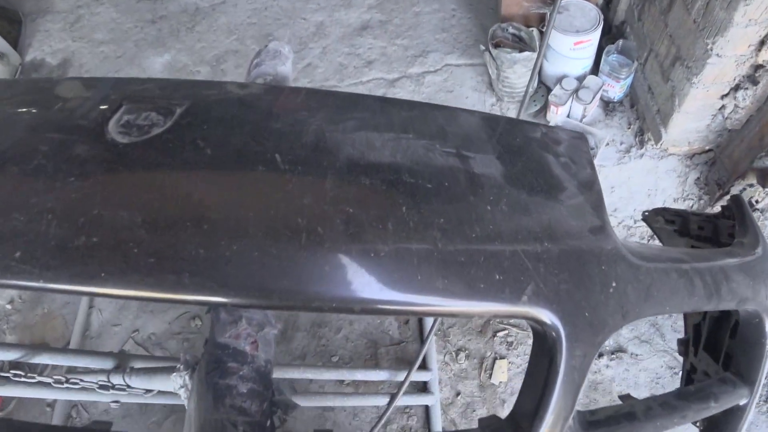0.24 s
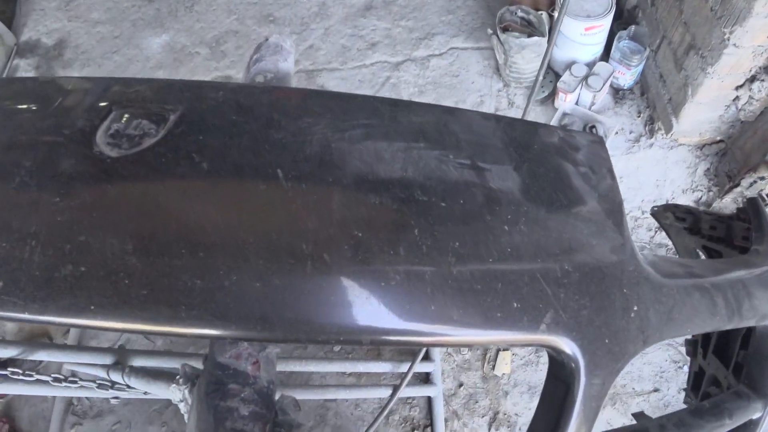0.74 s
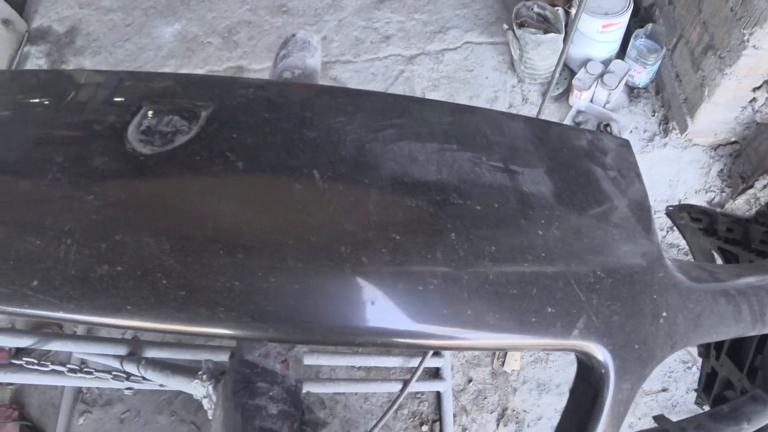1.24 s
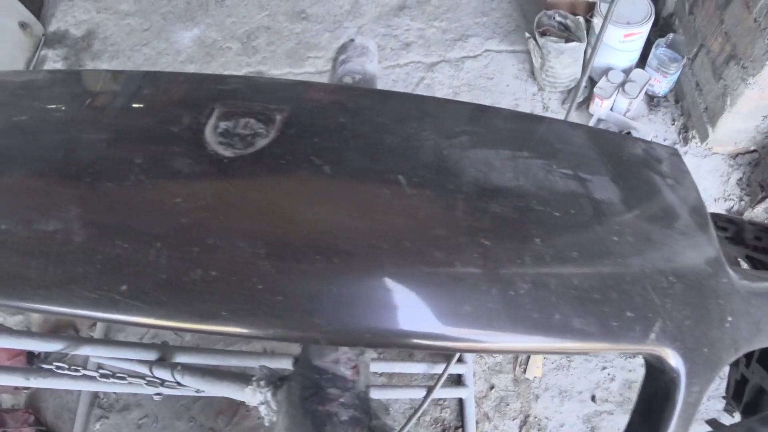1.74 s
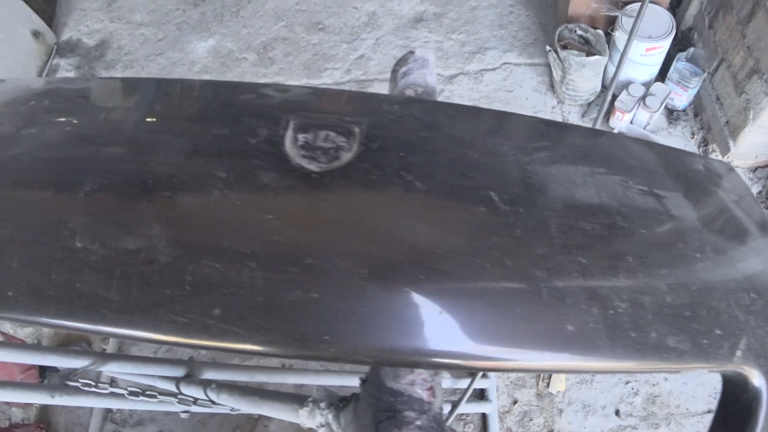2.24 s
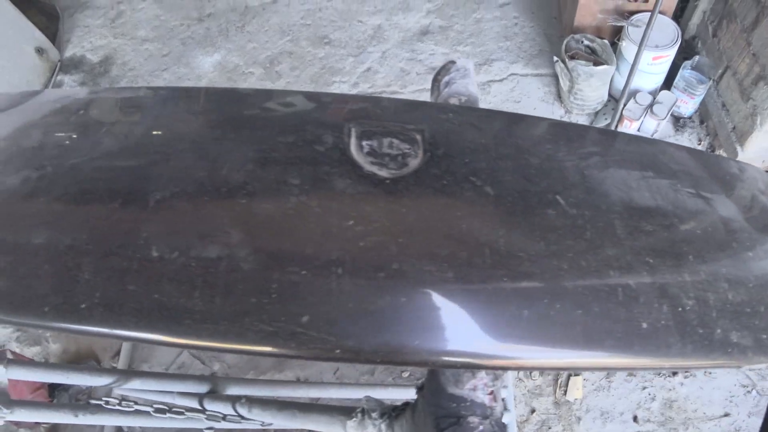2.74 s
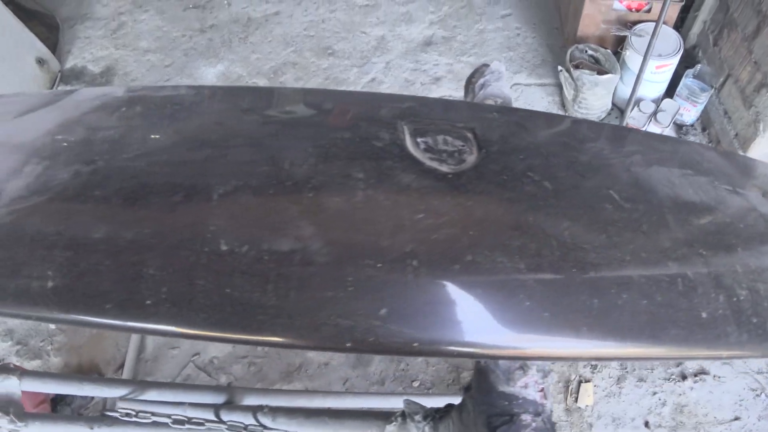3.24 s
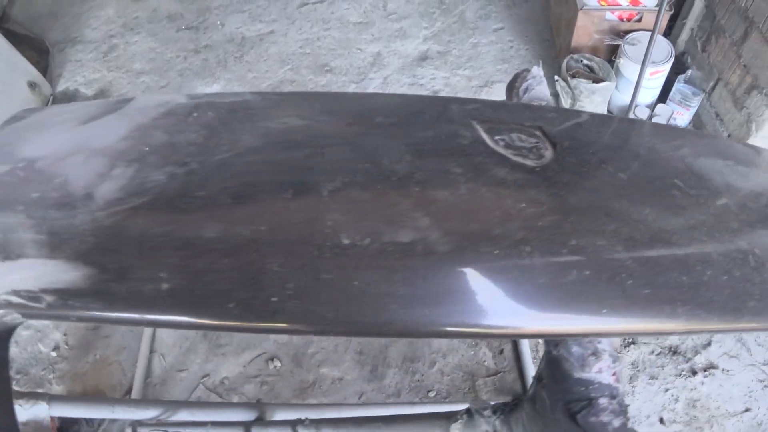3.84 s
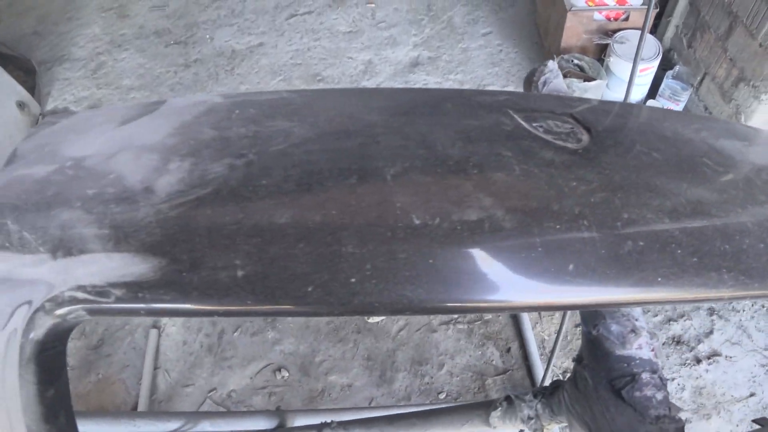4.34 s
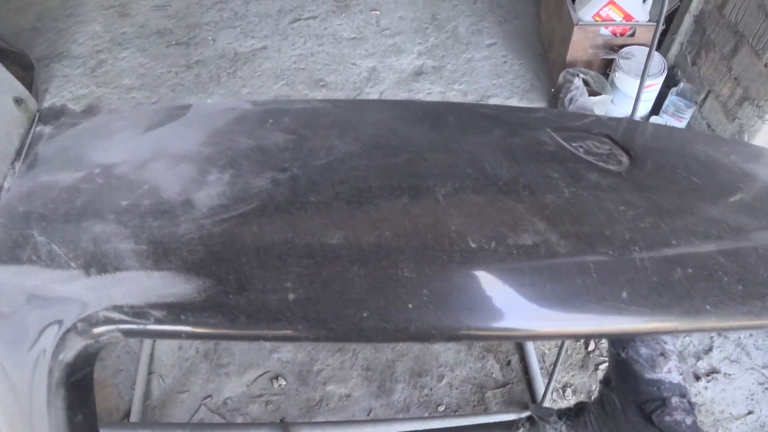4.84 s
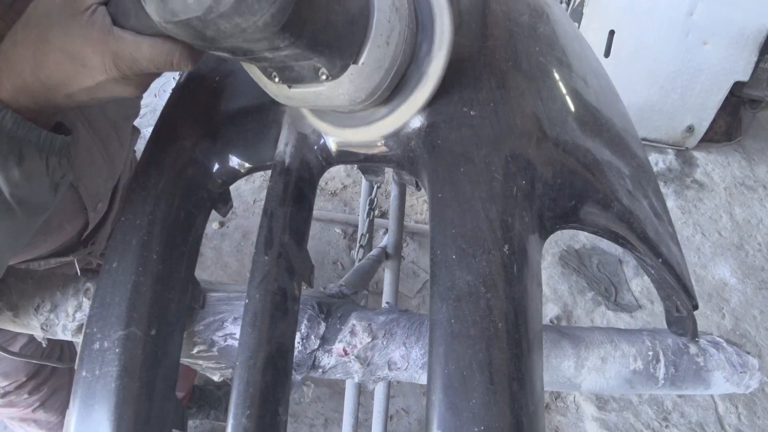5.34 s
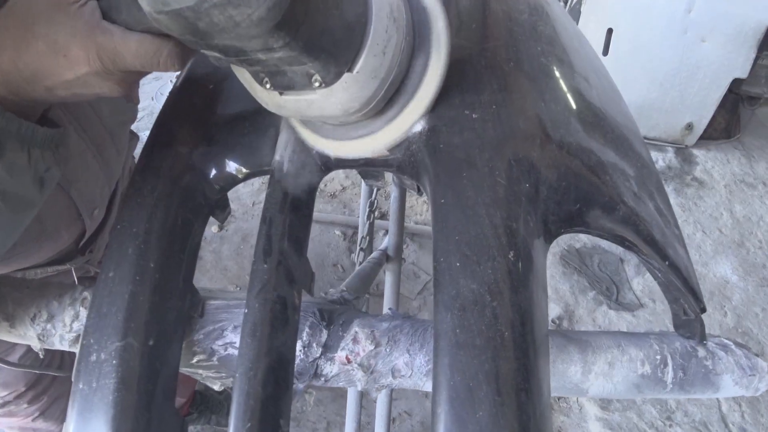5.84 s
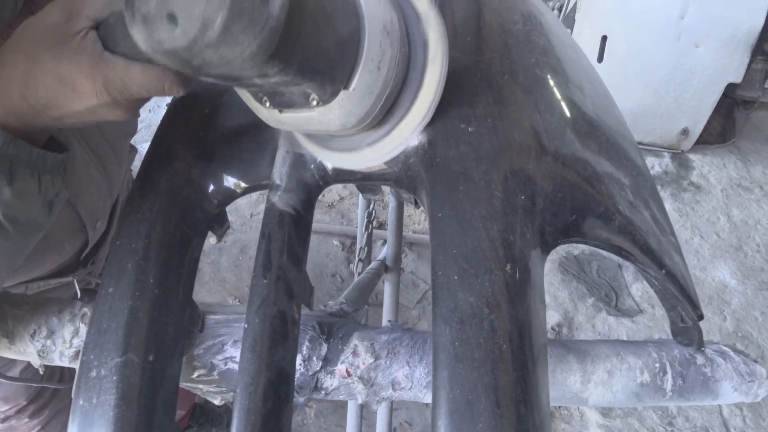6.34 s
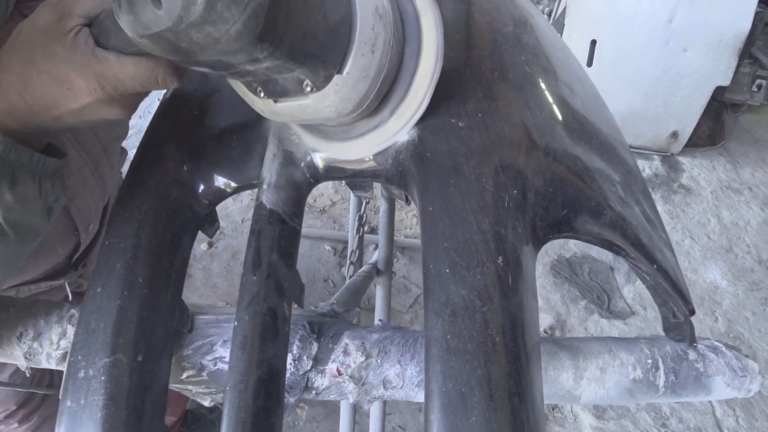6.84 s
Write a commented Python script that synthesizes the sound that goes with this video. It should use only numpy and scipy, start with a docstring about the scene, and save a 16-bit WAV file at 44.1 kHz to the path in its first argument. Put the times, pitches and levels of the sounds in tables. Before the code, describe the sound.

A grinder disc scrapes and squeals while coasting down, lifts off, then growls back up to a steady whine and hisses and buzzes against a hollow plastic panel.

```python
"""An angle grinder sands paint off a plastic bumper in a small workshop.
The disc coasts down: scraping noise and gear overtones that squeal in the resonances of disc and gear head.
Switched on again it growls, then runs free with the noise of its air and the whine of fan and gears. Pressed
on, it hisses (noise bursts once a turn) and slaps the hollow panel (partials of the spindle speed).
After a short silence with a brief ping the same work goes on, heard from beside the gear head."""
import sys
import numpy as np
from scipy import signal
from scipy.fft import rfft, irfft, next_fast_len
from scipy.io import wavfile
from scipy.ndimage import uniform_filter1d, map_coordinates

SR = 44100
rng = np.random.default_rng(int(sys.argv[2]) if len(sys.argv) > 2 else 0)


def inscribe(sig):
    """Save sig as 16-bit PCM at rate SR to the path in sys.argv[1].

    A 1-D sig is mono; a 2-D sig holds one channel per row.
    Samples are clipped to [-1, 1] before scaling.
    """
    pcm = np.round(np.clip(np.atleast_2d(sig).T, -1, 1) * 32767)
    wavfile.write(sys.argv[1], SR, pcm.astype(np.int16))


N = 312228
T = np.arange(N) / SR  # time [s]

# spindle speed under power, sagging with the load: (time [s], speed [turns/s])
RUNNING_SPEED = [(1.88, 112.5), (2.08, 111.5), (2.4, 112.85), (3.85, 113.0), (4.2, 111.4), (4.72, 111.38),
                 (4.96, 110.3), (5.22, 110.7), (5.3, 110.05), (5.75, 110.95), (5.98, 110.68), (6.2, 109.23),
                 (6.38, 108.62), (6.62, 108.93), (7.0, 110.85)]
# tool position: (time [s], left minus right [dB])
TOOL_PAN = [(0.0, -1.0), (1.1, -3), (2.95, -3.5), (3.42, 7), (4.05, 2.2), (5.3, 1.2), (7.08, 1.3)]
# left-right correlation of the noises: (frequency [Hz], correlation [0-1])
STEREO_LIKENESS = [(60, 0.98), (170, 0.82), (490, 0.95), (1400, 0.56), (3980, 0.85), (11400, 0.72)]
# resonances of disc and gear head: (frequency [Hz], width [Hz], relative gain [dB])
HEAD_RESONANCES = [(890, 72, -3), (1275, 28, -2.5), (2103, 73, 1.5), (2232, 23, 4.5), (2580, 124, 0.5),
                   (2900, 170, 5.5), (3404, 61, 3.5), (4230, 900, -3), (4620, 280, -4.5), (5000, 170, -4),
                   (5440, 45, 2.5), (6060, 150, 1), (7160, 190, -2.5), (7770, 250, -6)]
# noise colours of scrape, cooling air and grit: (frequency [Hz], relative density [dB])
SCRAPE_COLOUR = [(24, -61), (40, -27), (130, -30.5), (250, -16.5), (625, -9.5), (687, -11.5), (911, -5),
                 (1070, -9.5), (1360, -5.5), (1490, -5.5), (2390, -5), (2880, -6), (3240, -6.5),
                 (6110, -5.5), (11000, -12), (14300, -47), (22000, -120)]
AIR_COLOUR = [(30, -51), (70, -26), (160, -23), (300, -13), (480, -7), (750, 2.5), (1000, 2), (1150, 2),
              (1400, 5), (2200, -0.5), (3200, 0.5), (5000, -0.5), (7500, -1.5), (9000, -6), (11000, -5)]
GRIT_COLOUR = [(200, -45), (1500, -26), (3200, -5.5), (4500, -3), (6000, 2.5), (7600, 5.5), (9200, 2.5),
               (10400, 3.5), (11200, 0)]
# colour of the panel's rattle: (frequency [Hz], relative density [dB])
RATTLE_COLOUR = [(40, -53), (150, -10), (300, -29), (800, -30), (1400, -5), (2200, 7), (3500, -10), (9000, -27)]
# filter on the unloaded gear whine: (frequency [Hz], gain [dB])
LOOSE_COLOUR = [(1000, -20), (2100, 6), (2700, 1), (3400, -9), (4600, -2), (6000, -8.5)]
# gain of the unloaded gear whine: (time [s], gain [dB])
LOOSE_GAIN = [(1.07, -65.0), (1.2, -67.5), (1.4, -68.5), (1.47, -68), (1.56, -67), (1.68, -83)]
# short squeal, knock and scrapes: (time [s], level [dB], Gaussian sigma [s], centre of the noise peak [Hz])
SHORT_CONTACTS = [(1.046, -41, 0.0088, 2100), (1.165, -54, 0.017, 1010), (1.303, -58, 0.0032, 2700),
                  (4.44, -46.5, 0.014, 1100), (4.487, -45.5, 0.024, 2900)]
# reference level of motor and fan at top speed: (time [s], level [dB])
FAN_LEVEL = [(1.6, -59.5), (1.95, -58.5), (2.15, -60.5), (2.5, -61.5), (2.9, -61.5), (3.3, -60.5),
             (3.85, -53.5), (4.05, -49.5), (4.35, -51.5), (4.55, -50), (5.22, -51.5), (5.31, -56),
             (5.65, -53.5), (5.8, -51), (6.2, -52.5), (7.07, -50)]
# whine of gears and fan: (multiple of rotor speed, running free [dB re fan level], on the broad face, at the grille)
WHINE_LINES = [(8, -2, -10, -11.5), (12, 1, -7, -2), (16, -5, -4, 4), (20, -6, -6, -2.5),
               (32, -20, 0.5, -7.5)]
# further whines of constant level relative to the fan: (multiple of rotor speed, level [dB re fan level])
STEADY_WHINES = [(4, -5), (6, -6.5), (13, -11), (24, -8)]
# growl of the rotor under starting torque: (time [s], level [dB])
GROWL_LEVEL = [(1.38, -89), (1.43, -67), (1.5, -63), (1.54, -67), (1.6, -100)]
# pitch of the growl, rising as the rotor picks up: (time [s], frequency [Hz])
GROWL_PITCH = [(1.41, 535), (1.53, 768)]
# the disc pressed on the panel: (start [s], end [s], attack [s], release [s], slap reference [dB], boom [dB])
PANEL_PRESSES = [(1.895, 2.021, 0.038, 0.024, -50, -80), (3.9, 4.003, 0.037, 0.1, -43, -49.5),
                 (4.03, 4.164, .05, 0.12, -40.5, -53.5), (4.377, 4.538, 0.052, 0.073, -46.5, -67),
                 (4.482, 4.72, 0.094, .17, -42, -53.5), (4.715, 4.994, 0.059, 0.17, -42, -76.5),
                 (5.052, 5.24, 0.061, .05, -42, -59.5), (5.25, 5.44, .03, 0.21, -49.5, -71),
                 (5.644, 5.814, 0.12, .07, -46, -60), (5.85, 5.95, 0.054, 0.11, -47, -61),
                 (5.976, 6.227, 0.046, 0.089, -49.5, -63.5), (6.164, 6.72, 0.11, 0.15, -45.5, -64)]
# panel partials on the broad face and at the grille: (multiple of spindle speed, relative level [dB])
FACE_PARTIALS = [(3, -14), (4, -16), (5, -6), (6, -10), (7, -1), (8, -1), (9, 0.5), (10, -2), (11, -3.5),
                 (12, -1.5), (13, -1), (14, -8.5), (15, -20), (16, -2), (17, -4.5), (18, -3.5), (19, 0.5),
                 (20, -13.5), (21, -8), (22, -31), (23, -11), (24, -28), (25, -14)]
GRILLE_PARTIALS = [(3, -16.5), (4, -13), (5, -7.5), (6, -16), (7, 2.5), (8, 2.5), (9, -2), (10, 2),
                   (11, -5.5), (12, 3.5), (13, 0), (14, -3.5), (15, -7), (16, 3), (17, -6.5), (18, -36),
                   (19, -1), (20, -5.5), (21, 2), (22, -22.5), (23, 0), (24, -17), (25, -3.5), (26, -9)]
# hiss of grit on paint: (time [s], level [dB])
HISS_LEVEL = [(3.5, -64), (3.67, -49.5), (4.15, -47), (4.33, -44), (4.6, -43), (5.05, -40), (5.31, -44),
              (5.85, -45.5), (6.08, -43), (6.4, -41.5), (7.07, -41.5)]

LIFT_S, GAP_START_S, GAP_END_S = 1.061, 5.235, 5.299
TOP_HZ = 11080  # band limit
GEAR_RATIO = 2.991  # rotor turns per spindle turn
COAST_START_TURNS_PER_S, COAST_HALF_S = 69.85, 1.715  # drag halves the first speed in COAST_HALF_S
ON_S, RUN_UP_S, RUN_UP_SHAPE = 1.41, 0.157, 1.45  # switch-on, run-up time, steepness
COAST_DB, COAST_FADE_DB_PER_S = -38.5, 4
FAN_DB_PER_OCTAVE = 7.5  # per doubling of speed
WHINE_SWELL_DB, WHINE_SWELLS_PER_S = [2.8, 1.65], 7  # swell by echoes: far off, close by; rate
IDLE_BUZZ_DB = -7.5  # buzz reference of the free disc, re fan level
HUM_DB, HUM_PRESSED_DB, HUM_BOOM_DB = -22.5, -36, -21  # unbalance hum re fan level, slap reference, boom
RUN_UP_SHAKE_DB, SHAKE_SETTLE_S = 6.5, 0.87  # extra hum until the disc settles


def amp(db):
    """Decibels to gain."""
    return 10 ** (np.asarray(db) / 20)


def unit(x):
    """Scale to rms 1."""
    return x / np.sqrt(np.mean(x ** 2) + 1e-20)


def along(points, hz):
    """Interpolate (Hz, value) points on a log frequency axis."""
    f, v = np.transpose(points)
    return np.interp(np.log(hz + 1), np.log(f + 1), v)


def curves(rows):
    """One value per sample for each column after the time."""
    s, *cols = np.transpose(rows)
    return [np.interp(T, s, c) for c in cols]


def wobble(rate):
    """Smooth random curve with rate knots per second."""
    coarse = T[::32]
    knots = rng.standard_normal(int(T[-1] * rate) + 4)
    return np.interp(T, coarse, map_coordinates(knots, [coarse * rate]))


def filtered(x, response):
    """Apply a zero-phase response of frequency."""
    m = next_fast_len(N + 8192)
    return irfft(rfft(x, m) * response(np.fft.rfftfreq(m, 1 / SR)), m)[..., :N]


def rush(spectrum, patchy_db):
    """Coloured stereo noise of rms 1 with time-frequency patches of random gain."""
    z = signal.stft(rng.standard_normal((2, N)), nperseg=512)[2]
    field = uniform_filter1d(rng.standard_normal(z.shape[1:]), size=6, axis=0)
    field = uniform_filter1d(field, size=12, axis=1)
    pair = signal.istft(z * amp(patchy_db * unit(field)), nperseg=512)[1][:, :N]

    def mid_side_response(hz):
        turn = np.arccos(np.clip(along(STEREO_LIKENESS, hz), 0, 1)) / 2
        return amp(along(spectrum, hz)) * np.array([np.cos(turn), np.sin(turn)])

    mid, side = filtered(pair, mid_side_response)
    return unit(np.array([mid + side, mid - side]))


def tone(phase, fading, rate, width):
    """Stereo line of rms 1; randomly varying wall echoes add to it and cancel it."""
    def echo():
        return wobble(rate) * np.cos(phase) + wobble(rate) * np.sin(phase)

    mid = np.cos(phase) + fading * echo()
    side = width * echo()
    return unit(np.array([mid + side, mid - side]))


def once_a_turn(angle, depth_db, scatter_db):
    """Gain of rms 1, shaped once a turn by the bite of the disc's high spot, with random scatter."""
    bite = (0.5 + 0.5 * np.cos(angle)) ** 2
    return unit(amp(bite * (depth_db + scatter_db * wobble(110))))


def spindle_speed():
    """Drag slows the disc until the motor is switched on and pulls it up to running speed."""
    coast = COAST_START_TURNS_PER_S / (1 + np.minimum(T, ON_S) / COAST_HALF_S)
    running, = curves(RUNNING_SPEED)
    lag = np.exp(-(np.maximum(T - ON_S, 0) / RUN_UP_S) ** RUN_UP_SHAPE)
    return running + lag * (coast - running)


def gear_squeal(speed, rotor):
    """Each gear overtone swells as it slides through a resonance of disc and gear head."""
    squeal = 0
    for order in range(4, 62, 2):
        line_hz = order * GEAR_RATIO * speed
        power = sum(amp(db) ** 2 / (1 + (2 * (line_hz - hz) / width) ** 2) for hz, width, db in HEAD_RESONANCES)
        # overtones halfway between those of the gear mesh are weak, except the lowest
        halfway = order % 4 and order > 6
        line = tone(order * rotor + rng.uniform(0, 2 * np.pi), fading=0.6, rate=30, width=0.35)
        squeal = squeal + np.sqrt(power) * amp(-12 if halfway else 0) * line
    return squeal


def coasting(speed, rotor):
    """The slowing disc scrapes and squeals; once lifted, its unloaded gears flutter."""
    angle = rotor / GEAR_RATIO
    touching = np.interp(T, [LIFT_S - 0.001, LIFT_S + 0.001], [1, 0])
    squeal = gear_squeal(speed, rotor)
    scrape = rush(SCRAPE_COLOUR, patchy_db=1.1) * once_a_turn(angle, depth_db=-0.5, scatter_db=1.5)
    loaded_squeal = amp(-8.2) * squeal * once_a_turn(angle, depth_db=3, scatter_db=1.5)
    loaded = amp(COAST_DB - COAST_FADE_DB_PER_S * T) * (scrape + loaded_squeal)
    # without load the teeth rattle in their play and the whine flutters
    flutter = once_a_turn(angle, depth_db=7, scatter_db=4)
    loose = filtered(squeal, lambda hz: amp(along(LOOSE_COLOUR, hz))) * flutter
    loose_db, = curves(LOOSE_GAIN)
    return touching * loaded + (1 - touching) * amp(loose_db) * loose


def short_contacts(angle):
    """Short squeal, knock and scrapes: peaked noise under Gaussian envelopes, pulsing once a turn."""
    sound = 0
    for s, db, sigma_s, hz in SHORT_CONTACTS:
        colour = [(200, -18), (hz / 1.16, 0), (hz, 9), (hz * 1.06, 0), (7000, -4), (11000, -14)]
        envelope = np.exp(-0.5 * ((T - s) / sigma_s) ** 2)
        sound = sound + amp(db) * envelope * rush(colour, patchy_db=1.5)
    return sound * once_a_turn(angle, depth_db=4, scatter_db=1)


def motor(rotor, fan_db):
    """Cooling air with the whine of fan blades and gear teeth, and a growl at switch-on."""
    angle = rotor / GEAR_RATIO
    sound = amp(fan_db + 9.5) * rush(AIR_COLOUR, patchy_db=1.75)
    sound *= once_a_turn(angle, depth_db=0.5, scatter_db=2.0)
    powered = np.interp(T, [1.5, 1.68], [0, 1])
    swell_db = np.interp(T, [3.5, GAP_END_S], WHINE_SWELL_DB)
    for order, free_db, face_db, grille_db in WHINE_LINES:
        db = np.interp(T, [3.7, 4.05, GAP_START_S, GAP_END_S], [free_db, face_db, face_db, grille_db])
        db = db + fan_db + swell_db * wobble(WHINE_SWELLS_PER_S)
        # the crown wheel runs a little out of true: side lines one spindle turn apart
        runout = 0.45 * np.sin(angle + order)
        sound += powered * amp(db) * tone(order * rotor + runout, fading=0.3, rate=22, width=0.25)
    up_to_speed = np.interp(T, [1.45, 1.9], [0, 1])
    for order, db in STEADY_WHINES:
        line = tone(order * rotor + 0.94 * np.sin(angle), fading=0.65, rate=9, width=0.12)
        sound += up_to_speed * amp(fan_db + db) * line
    growl_db, = curves(GROWL_LEVEL)
    growl_hz, = curves(GROWL_PITCH)
    growl = tone(2 * np.pi * np.cumsum(growl_hz) / SR, fading=1.2, rate=110, width=0.4)
    return sound + amp(growl_db) * growl * once_a_turn(angle, depth_db=6, scatter_db=-2)


def press(start, end, attack, release):
    """The hand bears down, holds, and eases off."""
    return np.clip((T - start) / attack, 0, 1) * np.exp(-np.maximum(T - end, 0) / release)


def panel_buzz(angle):
    """Slaps of the disc drive the panel at multiples of the spindle speed."""
    buzz = np.zeros((2, N))
    for panel, heard in ((FACE_PARTIALS, T < GAP_END_S), (GRILLE_PARTIALS, T >= GAP_END_S)):
        # each partial has its own phase lag through the plastic, which smears a slap into a short burst
        lags = np.cumsum(rng.normal(0, 0.88, len(panel)))
        partials = 0
        for (order, db), lag in zip(panel, lags):
            partials = partials + amp(db) * tone(order * angle - lag, fading=0.3, rate=7, width=0.16)
        buzz += heard * unit(partials)
    return buzz * amp(0.3 * wobble(90))


def bumper(angle, fan_db):
    """One slap a turn makes the hollow panel buzz, rattle and boom, over the hum of the unbalanced disc."""
    slap = np.max([amp(db) * press(*shape) for *shape, db, _ in PANEL_PRESSES], axis=0)
    boom = np.max([amp(db) * press(*shape) for *shape, _, db in PANEL_PRESSES], axis=0)
    settling = np.maximum(T - ON_S - RUN_UP_S, 0) / SHAKE_SETTLE_S
    shake_db = RUN_UP_SHAKE_DB * np.exp(-settling ** 2)
    hum = amp(fan_db + HUM_DB + shake_db) + amp(HUM_PRESSED_DB) * slap + amp(HUM_BOOM_DB) * boom
    buzz = panel_buzz(angle)
    rattle = rush(RATTLE_COLOUR, patchy_db=2.5) * once_a_turn(angle, depth_db=16, scatter_db=1)
    low = hum * tone(angle, fading=0.17, rate=5.9, width=0.061)
    low = low + boom * tone(2 * angle, fading=0.15, rate=8, width=0.093)
    low = low * amp(1.4 * wobble(40))
    spinning = np.interp(T, [1.55, 1.72], [0, 1])
    drive = np.hypot(slap, amp(fan_db + IDLE_BUZZ_DB))
    return spinning * (drive * (amp(2.0) * buzz + amp(-8.5) * rattle) + low)


def sanding(angle):
    """Grit tears the paint in one burst a turn; the bursts harden when the disc's edge digs in."""
    hiss_db, = curves(HISS_LEVEL)
    digging_db = np.interp(T, [5.7, 5.77, 6.01, 6.08], [1.1, 4.4, 4.1, 1.3])
    touching = np.interp(T, [3.35, 3.55], [0, 1])
    bursts = once_a_turn(angle, depth_db=digging_db, scatter_db=1.0)
    return touching * amp(hiss_db) * rush(GRIT_COLOUR, patchy_db=1.5) * bursts


def scene():
    """All layers turn with the one spindle; the tool is panned, the wide panel stays in the middle."""
    speed = spindle_speed()
    jitter = 0.000473 * wobble(35)
    angle = 2 * np.pi * np.cumsum(speed * (1 + jitter)) / SR
    rotor = GEAR_RATIO * angle
    fan_db = curves(FAN_LEVEL)[0] + FAN_DB_PER_OCTAVE * np.log2(speed / speed.max())
    tool = coasting(speed, rotor) + short_contacts(angle)
    tool = tool + (T > LIFT_S) * motor(rotor, fan_db) + sanding(angle)
    pan_db, = curves(TOOL_PAN)
    return tool * amp(np.array([pan_db, -pan_db]) / 2) + bumper(angle, fan_db)


def record(dry):
    """The sound drops out briefly, leaving a short ping; a steep low-pass sets the band limit."""
    heard = np.interp(T, [GAP_START_S - 0.002, GAP_START_S, GAP_END_S, GAP_END_S + 0.001], [1, 0, 0, 1])
    fading = np.interp(T, [GAP_START_S - 0.002, GAP_START_S, GAP_START_S + 0.022], [0, 1, 0])
    ping = amp(-48) * fading * np.sin(2 * np.pi * 2110 * T)
    return filtered(dry * heard + ping, lambda hz: np.clip((TOP_HZ - hz) / 80 + 0.5, 0, 1))


dry = scene()
out = record(dry)
inscribe(out)
```